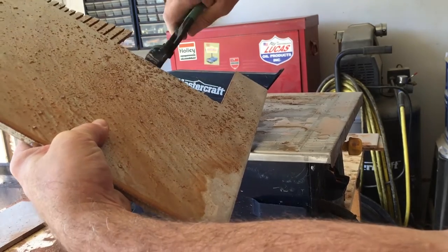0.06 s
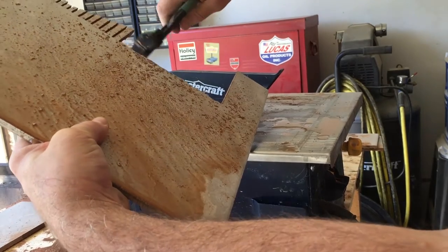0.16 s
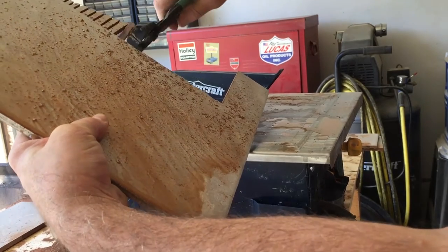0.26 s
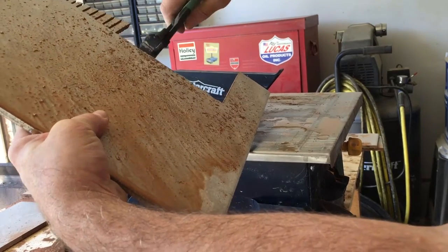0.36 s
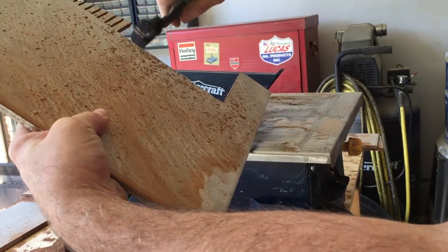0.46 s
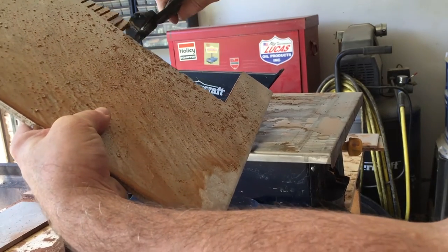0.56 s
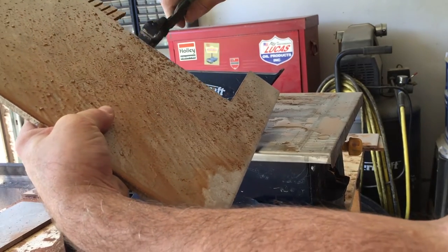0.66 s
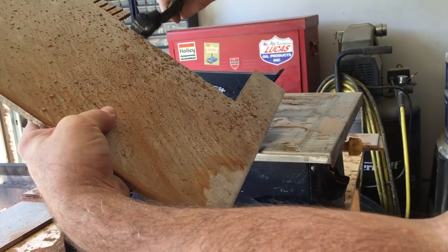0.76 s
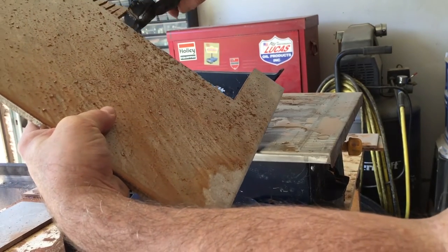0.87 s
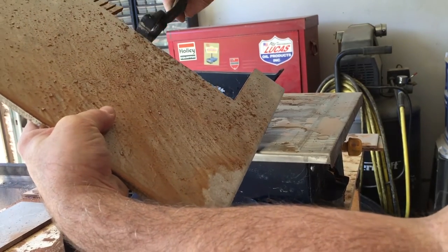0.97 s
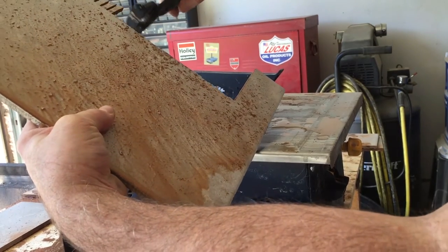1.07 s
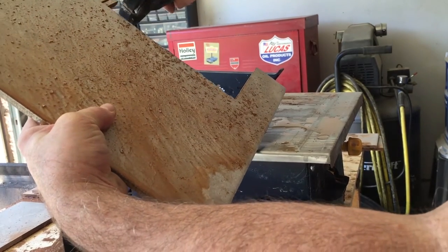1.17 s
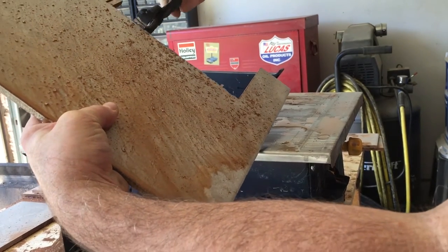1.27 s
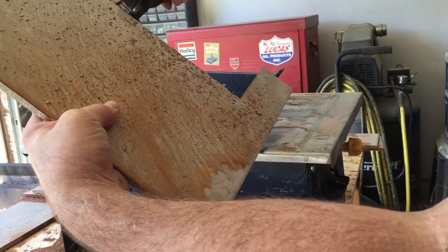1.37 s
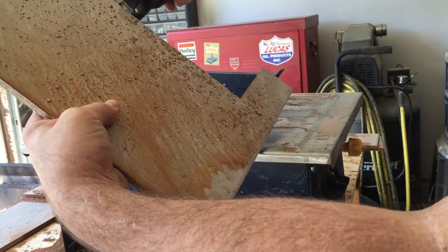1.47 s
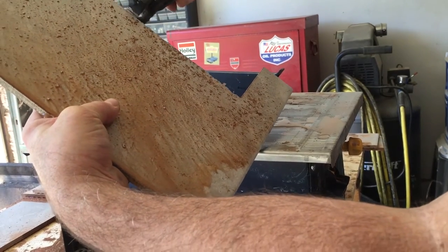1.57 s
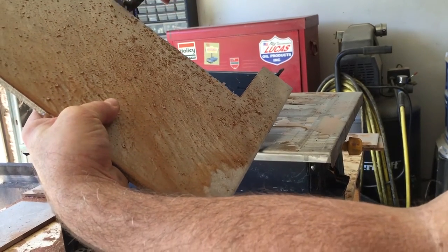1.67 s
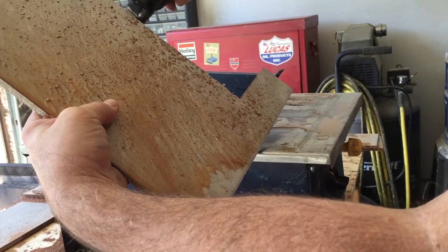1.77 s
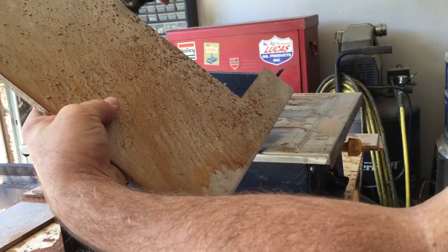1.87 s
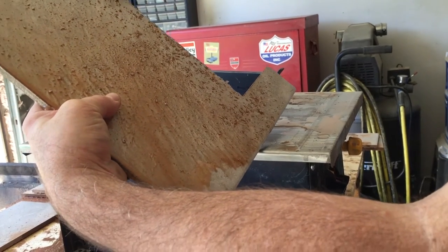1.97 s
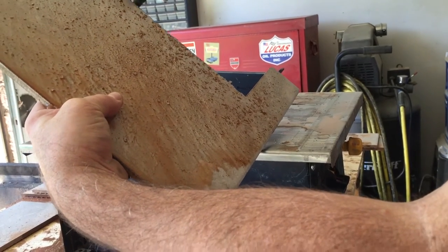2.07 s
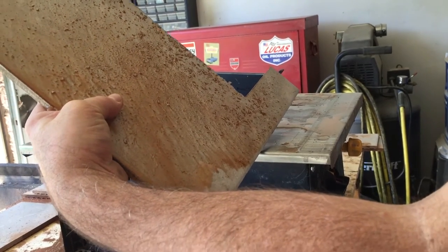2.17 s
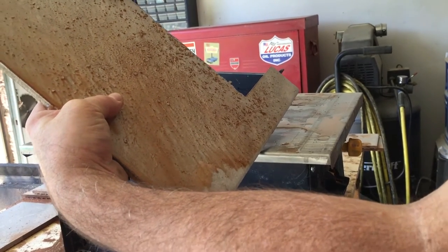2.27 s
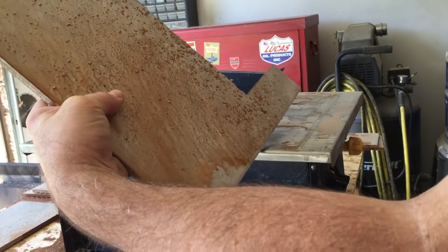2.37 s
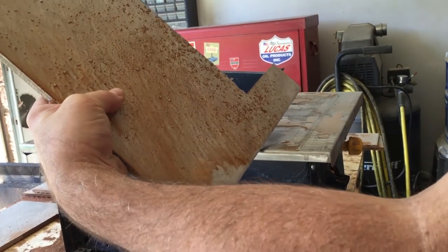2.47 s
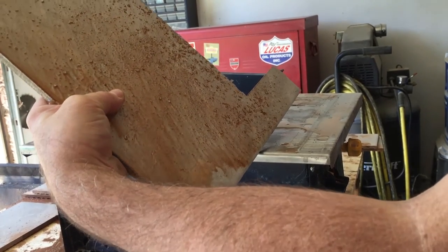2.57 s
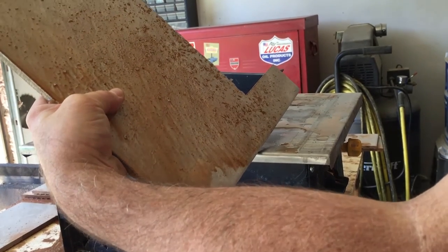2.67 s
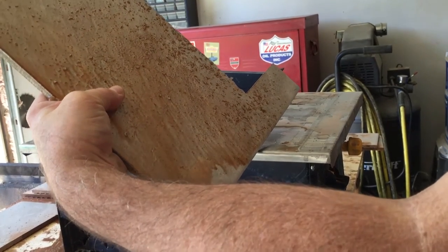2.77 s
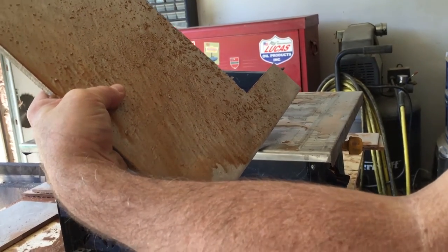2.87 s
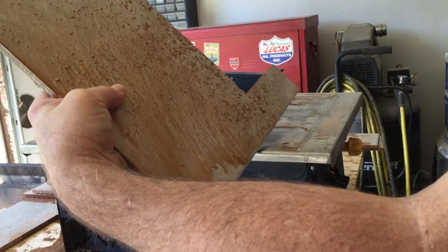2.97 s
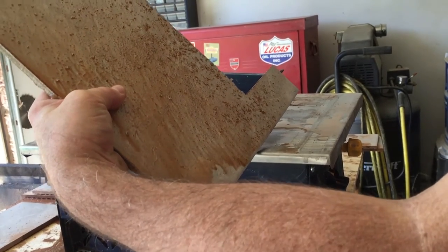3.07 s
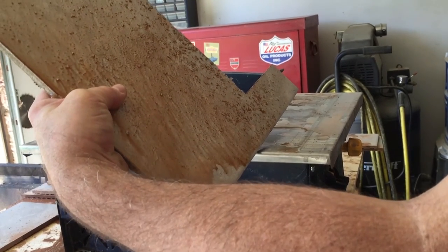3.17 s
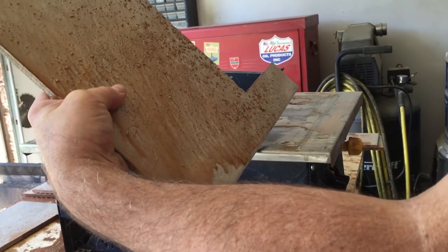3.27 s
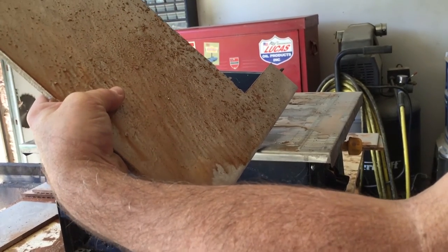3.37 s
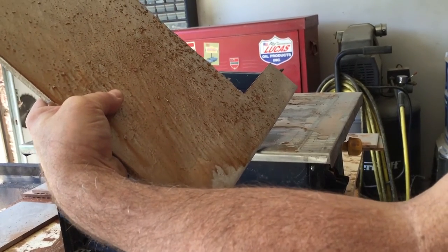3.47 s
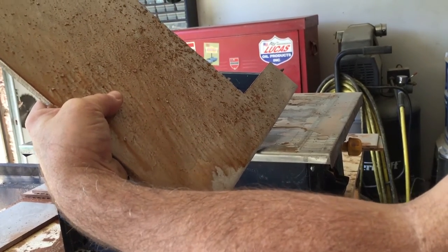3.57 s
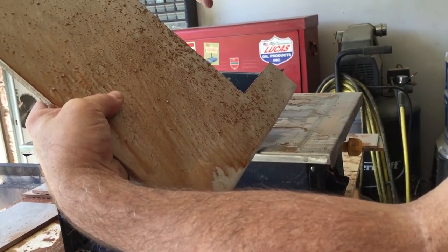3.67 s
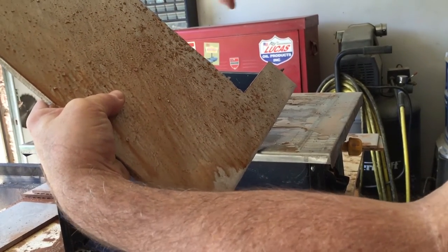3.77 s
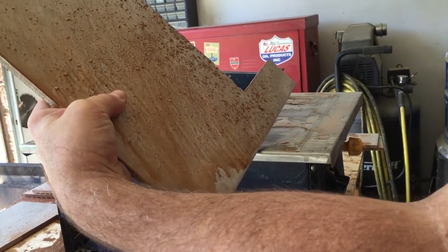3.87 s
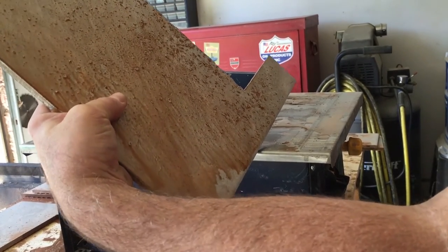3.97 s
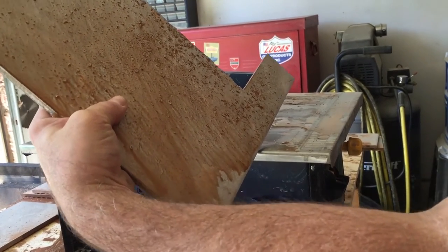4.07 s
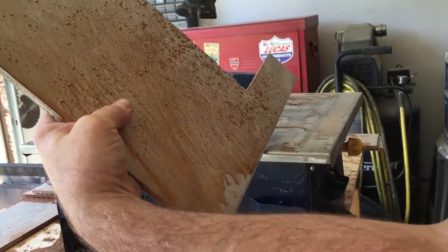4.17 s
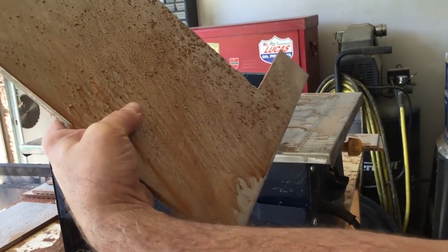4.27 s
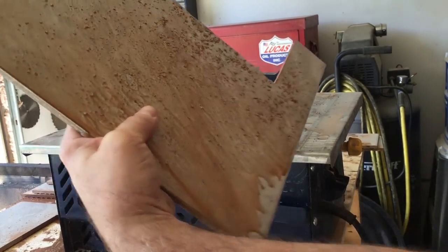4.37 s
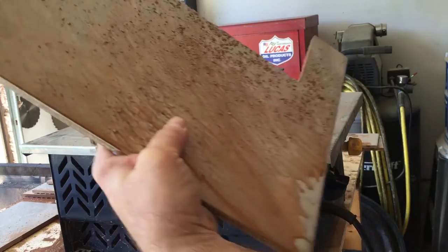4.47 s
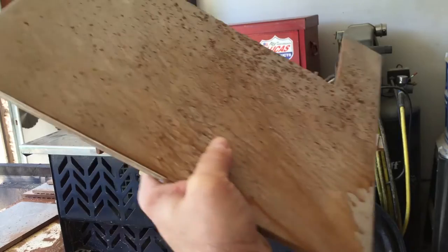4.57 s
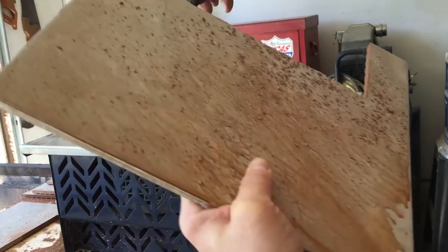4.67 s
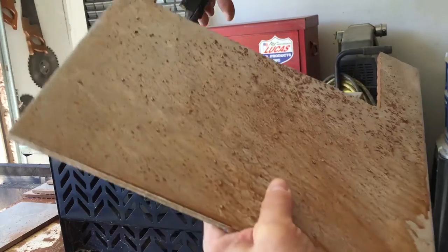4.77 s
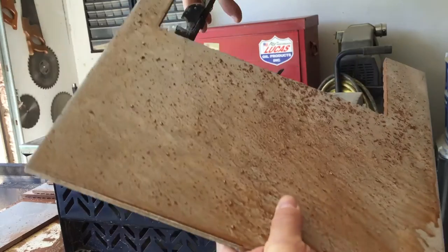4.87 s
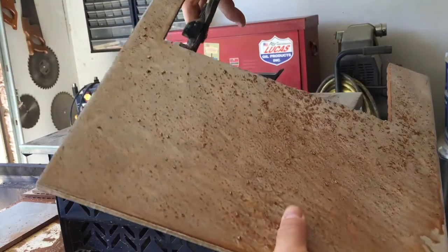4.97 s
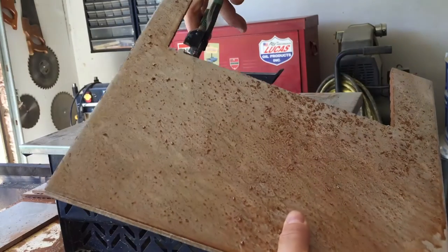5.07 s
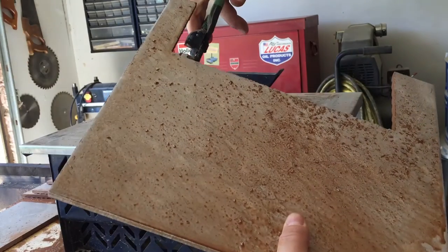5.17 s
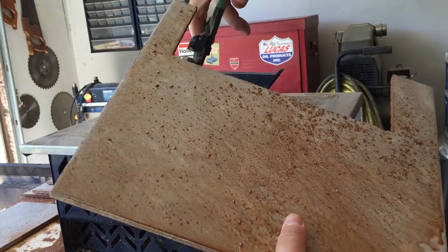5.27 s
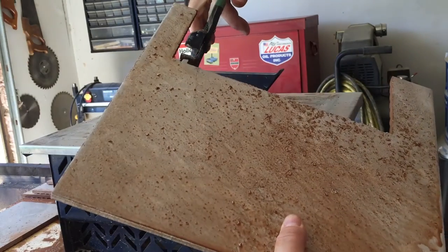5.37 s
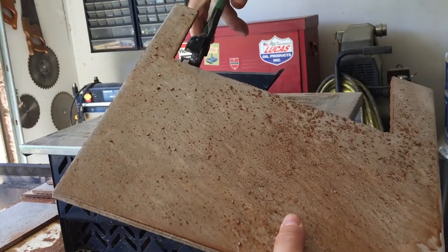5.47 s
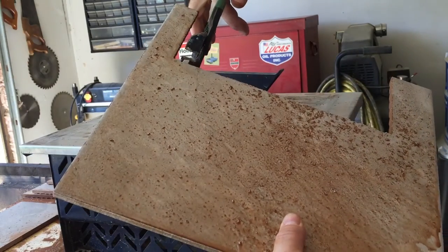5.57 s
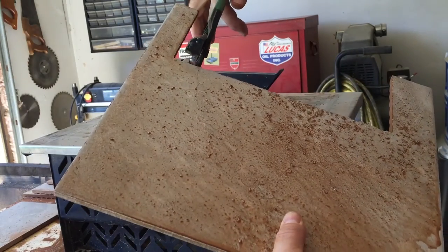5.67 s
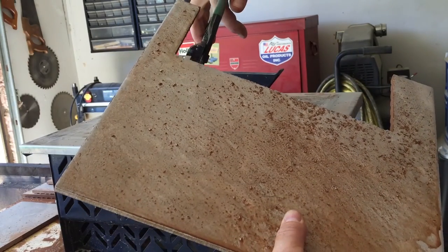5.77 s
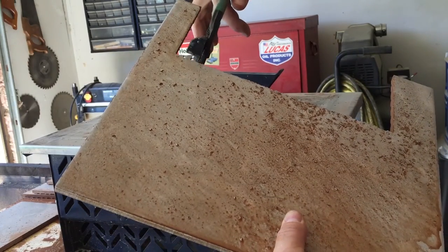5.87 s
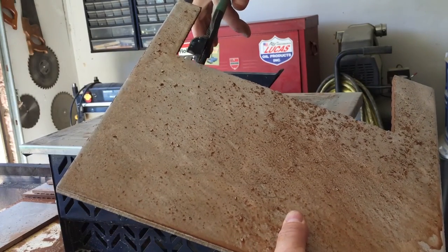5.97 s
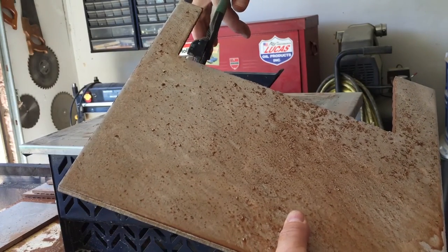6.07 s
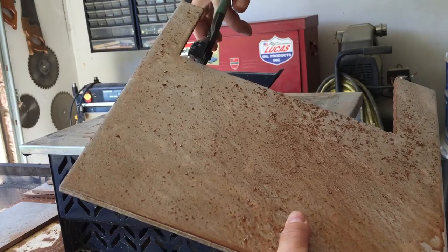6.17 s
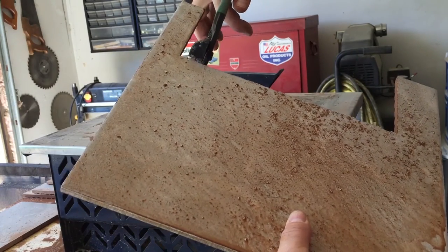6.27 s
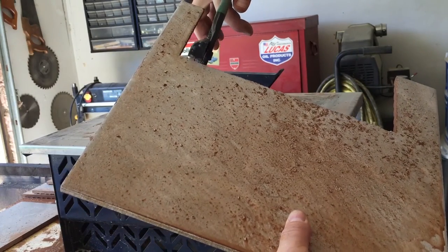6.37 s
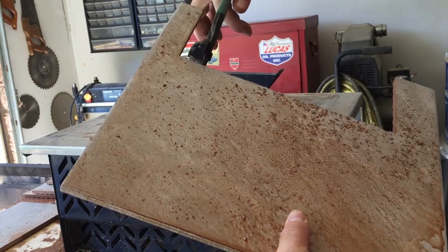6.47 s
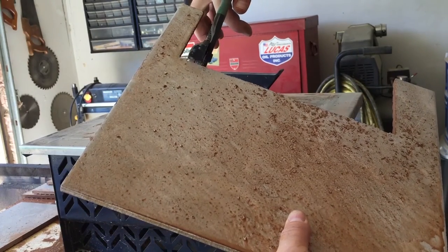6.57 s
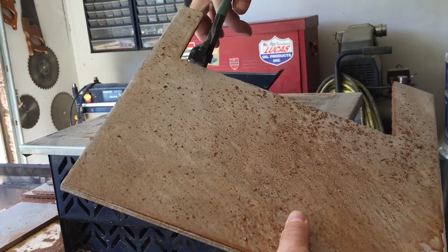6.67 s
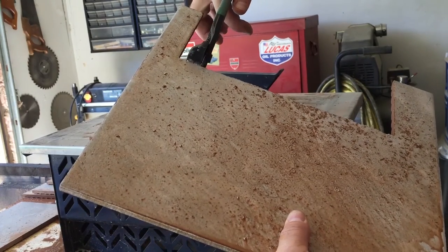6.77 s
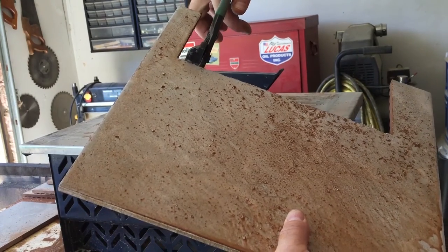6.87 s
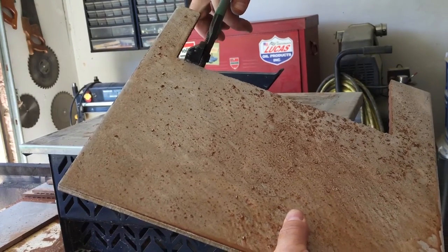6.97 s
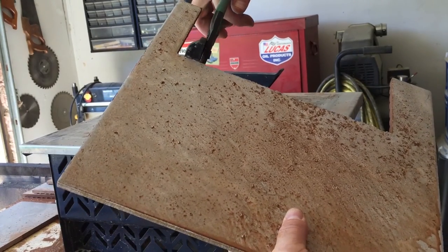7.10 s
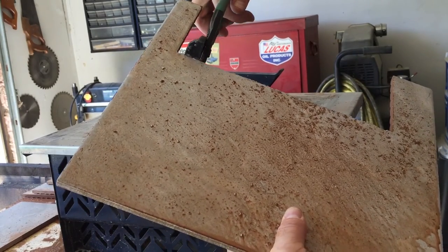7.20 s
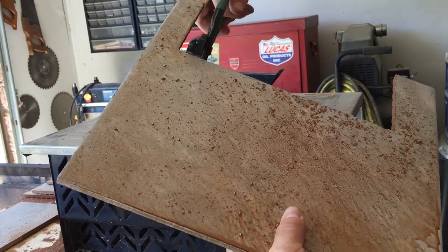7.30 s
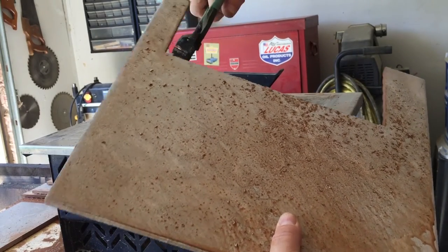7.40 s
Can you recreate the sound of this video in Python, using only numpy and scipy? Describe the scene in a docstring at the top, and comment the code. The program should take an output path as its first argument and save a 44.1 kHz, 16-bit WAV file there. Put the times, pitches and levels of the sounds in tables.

```python
"""In a garage, close by: nippers snap chips off a hand-held tile, noise cracks with ringing modes, for 3 s.
Chips bounce on a steel bench and a larger piece thuds. The tile is then turned and the jaws scrape and knock
along a new edge, random catches ringing its modes, among puffs of filtered hiss. A dove outside coos gliding
sines from 5 s. One last loud snap starts just before the end. Throughout, narrow noise bands make a motor
hum over a broad murmur; the microphone loses deep bass, gain control follows loud blows, the loudest clip."""
import sys
import numpy as np
from scipy import signal
from scipy.fft import rfft, irfft
from scipy.io import wavfile
from scipy.ndimage import uniform_filter1d

SR = 44100
rng = np.random.default_rng(int(sys.argv[2]) if len(sys.argv) > 2 else 0)


def pcm_store(signal):
    """Save signal as 16-bit PCM."""
    levels = np.round(np.clip(np.atleast_2d(signal), -1, 1) * 32767)
    wavfile.write(sys.argv[1], SR, levels.astype(np.int16).T)


N = 328104  # length in samples

SPREAD_DB = 2.2  # chance spread of mode levels from blow to blow
GRIP_HZ = 14  # spread of the detuning by the shifting grip


def gain_of(db):
    """Amplitude factor for a level in dB."""
    return 10 ** (np.asarray(db) / 20)


def evened(x):
    """Scale to an rms of 1."""
    return x / np.sqrt(np.mean(x ** 2) + 1e-20)


def read(points, hz):
    """Read a curve of (Hz, value) points, interpolated over log frequency."""
    f, value = np.transpose(points)
    return np.interp(np.log(hz + 1), np.log(f + 1), value)


def resonate(x, hz, width):
    """A two-pole resonance of gain about 1."""
    r = np.exp(-np.pi * width / SR)
    return signal.lfilter([1 - r, 0, r - 1], [1, -2 * r * np.cos(2 * np.pi * hz / SR), r * r], x)


def ringing(modes, colour, spread_db):
    """One blow on a body: each mode gets a chance strength and sign; the grip detunes it, low modes most by ratio."""
    hz, db, t60 = np.transpose(modes)[:, :, None]
    t = np.arange(SR // 3) / SR
    chance = rng.standard_normal((3, len(modes), 1))
    level_db = db + read(colour, hz) + spread_db * chance[1] - 60 * t / np.clip(t60, .02, .3)
    detuned = hz + GRIP_HZ * chance[2]
    envelope = np.exp(np.float32(level_db * np.log(10) / 20))
    tones = np.sin(np.float32(2 * np.pi * detuned * t))
    return (np.sign(chance[0]) * envelope * tones).sum(0)


def blows(events, modes, kind, spread_db):
    """Each blow is a gritty crack, a shard with a cluster of modes, and a body coloured by where it is struck."""
    out, t = np.zeros(N + SR), np.arange(SR // 3) / SR
    hz = np.fft.rfftfreq(len(t), 1 / SR)
    rise, ring_db, shard_db, share = kind
    for s, db, low_db, middle_db, high_db, treble_db, shard_hz, t60 in events:
        # noise whose level jumps every 60 samples
        steps = gain_of(2.9 * rng.standard_normal(len(t) // 60 + 1)).repeat(60)[:len(t)]
        grit = rng.standard_normal(len(t)) * steps
        colour = [(80, low_db - 45), (300, low_db - 10), (600, low_db + 4), (1600, middle_db + 14),
                  (2500, db - 2), (5000, db - 1), (8500, treble_db + 7), (15000, treble_db - 6.5)]
        coloured = irfft(rfft(evened(grit)) * gain_of(read(colour, hz)), len(t))
        crack = coloured * gain_of(-60 * t / np.clip(t60, .02, .2))
        # twelve weaker modes scattered around the shard's main pitch
        others = [(min(shard_hz * np.exp(.24 * a), 15000), -6, t60 * (0.52 + b))
                  for a, b in zip(rng.standard_normal(12), rng.random(12))]
        shard_modes = [(shard_hz, 0, 1.5 * t60)] + others
        shard = ringing(shard_modes, [(shard_hz, shard_db + share * high_db)], spread_db)
        struck = [(1100, low_db), (1400, middle_db), (1850, middle_db), (2300, high_db - 6)]
        body = gain_of(ring_db) * ringing(modes, struck, spread_db)
        onset = np.minimum(t / max(rise, .0002), 1)
        out[round(s * SR):][:len(t)] += onset * (crack + shard + body)
    return out[:N]


# Snaps of the tile, close by. Each row: start in seconds, then crack, low modes, middle modes, clink and treble
# as drive levels in dB, central shard pitch in Hz, decay setting (T60 before limits) in seconds.
SNAP_EVENTS = [(0.0, -24.0, -27.5, -27.5, -23.5, -23.0, 4320, 0.15),
               (0.2206, -8.0, -20.5, -20.5, -15.5, -14.5, 2880, 0.11),
               (0.4876, -22.5, -27.5, -36.5, -19.5, -10.5, 2870, 0.069),
               (0.5031, -3.0, -21.5, -21.0, -13.5, -14.0, 3420, 0.091),
               (0.8052, -9.0, -27.0, -20.5, -15.5, -13.5, 8370, 0.12),
               (0.8194, -3.0, -16.5, -25.5, -24.0, -25.0, 4160, 0.12),
               (1.1276, -9.0, -23.0, -21.5, -20.5, -21.0, 3780, 0.099),
               (1.3651, -8.0, -23.0, -21.0, -24.0, -22.5, 3950, 0.084),
               (1.7178, -1.0, -18.0, -14.5, -20.5, -15.5, 2890, 0.12),
               (1.9519, -9.5, -33.5, -31.5, -19.5, -6.5, 8070, 0.046),
               (1.9588, 3.0, -18.0, -19.0, -16.5, -4.0, 9000, 0.07),
               (2.2416, 2.5, -17.0, -18.0, -16.5, -5.5, 3470, 0.071),
               (2.5039, -5.0, -44.5, -29.0, -27.0, -9.0, 7660, 0.052),
               (2.5094, -0.0, -19.5, -21.5, -12.0, -17.5, 3530, 0.067),
               (2.7495, -6.5, -23.5, -14.0, -14.0, -31.0, 3520, 0.065),
               (2.7632, -24.5, -33.5, -28.0, -29.5, -23.5, 3520, 0.1),
               (2.9957, -12.0, -19.0, -15.5, -19.0, -35.5, 4240, 0.069),
               (7.424, 11.0, -13.0, -13.5, -3.0, -1.0, 6760, 0.067)]
# Modes of the hand-held tile. Each row: centre frequency in Hz, relative level in dB, T60 in seconds.
TILE_MODES = [(349, -2.5, 0.05), (585, -4, 0.11), (664.3, -1.5, .1), (850, -8, .1), (1031, -5, 0.083),
              (1425, -12.5, .08), (1539, 1, 0.17), (1716, -6.5, 0.24), (1790, -5, .15), (2000, -3.5, .14),
              (2270, -0.5, .15), (2602, -9.5, 0.11), (3330, -5, .15), (3460, -0.5, .2), (3790, -4, .2),
              (3994, -6, .18), (4270, -6.5, 0.06), (5000, -11, .2), (6017, -7.5, .2), (6760, -16, .15)]
# What each kind of blow shares: rise in seconds, ring of the body in dB,
# shard level at 0 dB clink in dB, share of the clink that the shard follows.
SNAP_KIND = (.0018, -2, -12, .6)


def snaps():
    """The jaws break the edge, so the tile rings with all its modes."""
    return blows(SNAP_EVENTS, TILE_MODES, SNAP_KIND, SPREAD_DB)


# Chips knocking tile and bench. Each row: start in seconds, then crack, low modes, middle modes, clink and treble
# as drive levels in dB, central shard pitch in Hz, decay setting (T60 before limits) in seconds.
CHIP_EVENTS = [(0.093, -34.0, -46.0, -42.5, -30.5, -40.5, 3450, 0.073),
               (0.2875, -10.0, -21.5, -17.0, -8.0, -10.0, 3470, 0.079),
               (0.5785, -17.0, -34.5, -30.5, -20.0, -14.0, 3340, 0.029),
               (0.5821, -4.0, -22.5, -15.0, -7.5, -11.5, 4380, 0.087),
               (0.8719, -8.0, -28.0, -23.5, -29.5, -15.5, 6420, 0.056),
               (0.8893, -12.5, -20.5, -19.0, -21.5, -22.0, 3470, 0.12),
               (0.9586, -11.5, -38.5, -36.0, -33.5, -15.5, 6730, 0.035),
               (0.9781, -19.5, -34.0, -34.0, -29.0, -36.5, 4220, 0.056),
               (1.1852, -10.5, -24.0, -25.5, -19.5, -25.0, 8500, 0.071),
               (1.1906, -2.5, -22.5, -20.0, -9.0, -12.5, 3450, 0.064),
               (1.4521, 2.5, -28.0, -18.0, -6.0, -12.5, 4580, 0.049),
               (1.8143, -13.5, -27.0, -28.0, -38.0, -35.0, 4150, 0.09),
               (1.8835, -17.0, -38.5, -35.0, -29.5, -21.0, 8270, 0.077),
               (1.9985, -8.0, -18.0, -23.0, -23.5, -29.0, 4810, 0.093),
               (2.1164, -20.0, -32.0, -42.0, -37.0, -28.5, 4230, 0.065),
               (2.1784, -27.0, -41.0, -51.0, -45.0, -42.5, 4400, 0.06),
               (2.3289, -24.5, -36.0, -36.0, -28.5, -26.0, 3710, 0.088),
               (2.374, -27.5, -47.0, -44.0, -44.5, -28.5, 6050, 0.052),
               (2.4494, -21.0, -48.5, -36.5, -33.0, -30.5, 5350, 0.074),
               (2.615, -13.5, -34.5, -28.0, -25.5, -15.5, 9000, 0.048),
               (2.7844, -26.5, -25.5, -32.0, -40.5, -30.0, 3500, 0.043),
               (2.8667, -19.5, -60.5, -50.5, -36.5, -37.0, 8170, 0.038),
               (2.8839, -38.5, -54.0, -42.0, -50.5, -50.0, 3440, 0.042),
               (3.038, -44.0, -48.0, -28.0, -48.0, -41.0, 3500, 0.06)]
# Modes of the steel bench. Each row: centre frequency in Hz, relative level in dB, T60 in seconds.
BENCH_MODES = [(2536, -15, 0.22), (3004, -10.5, 0.17), (3486, 3.5, 0.072), (3770, -9.5, 0.23),
               (4290, -8, 0.099), (4510, 1, .12), (4600, -18.5, 0.093), (5351, -12, .15), (6100, -19, .15),
               (8300, -14.5, .12), (8430, -15, 0.11), (8995, -20.5, .12)]
CHIP_KIND = (.0014, -1, -22, .35)  # as SNAP_KIND


def chips():
    """Bouncing chips excite the tile's ten lowest modes and the bench together."""
    return blows(CHIP_EVENTS, TILE_MODES[:10] + BENCH_MODES, CHIP_KIND, SPREAD_DB)


# A larger piece drops and bounces; later the tile brushes and bumps the bench. Each row: start in seconds,
# peak level of the noise in dB, body pitch in Hz, upper noise edge in Hz, time to fall 20 dB in seconds,
# rise in seconds.
THUD_EVENTS = [(1.161, 0, 263, 2200, 0.021, 0.0013), (1.304, -17, 400, 2400, .014, .0012),
               (1.4, -18, 515, 2600, 0.053, 0.0009), (4.208, -37.5, 352, 3100, .05, .03),
               (5.894, -35, 270, 834, 0.0089, 0.0012), (5.999, -32, 329, 833.3, 0.014, .001)]


def thuds():
    """A dull blow: band-passed noise and a briefly ringing hollow body."""
    out, t = np.zeros(N + SR), np.arange(SR // 4) / SR
    for s, db, body_hz, edge_hz, length, rise in THUD_EVENTS:
        burst = rng.standard_normal(len(t)) * gain_of(-20 * t / length) * np.minimum(t / rise, 1)
        dull = signal.sosfilt(signal.butter(2, [240, edge_hz], "band", fs=SR, output="sos"), burst)
        onset = np.minimum(t / (rise + 0.0035), 1)
        body = np.sin(2 * np.pi * body_hz * t) * gain_of(-16 * t / length) * onset
        out[round(s * SR):][:len(t)] += gain_of(db) * (dull / abs(dull).max() + gain_of(-12.5) * body)
    return out[:N]


# Blows that set off the tile's longest ring. Each row: start in seconds, level before decay in dB.
RING_BLOWS = [(0.0, -22.5), (.288, -27), (.584, -31), (.89, -32), (1.19, -33), (1.454, -23), (1.719, -28),
              (1.959, -32), (2.243, -32), (2.511, -18), (2.75, -17), (2.997, -17.5)]
RING_T60 = .44  # seconds
RING_HZ, RING_CLIMB_HZ_PER_S = 1610, 6.5  # the ring rises as the edge is nibbled away


def long_ring():
    """The one mode of the tile that the hand hardly damps."""
    out, t = np.zeros(N + SR), np.arange(SR // 2) / SR
    for s, db in RING_BLOWS:
        hz = RING_HZ + RING_CLIMB_HZ_PER_S * s
        decay = gain_of(db - 60 * t / RING_T60)
        out[round(s * SR):][:len(t)] += decay * np.sin(2 * np.pi * hz * t) * np.minimum(t / 0.0035, 1)
    return out[:N]


# Jaws knocking the turned tile. Each row: start in seconds, then crack, low modes, middle modes, clink and treble
# as drive levels in dB, central shard pitch in Hz, decay setting (T60 before limits) in seconds.
KNOCK_EVENTS = [(4.5744, -53.0, -54.0, -68.0, -68.0, -72.0, 3514, 0.04),
                (5.898, -14.5, -27.0, -40.0, -36.0, -29.5, 4250, 0.026),
                (5.9983, -30.0, -21.5, -36.5, -34.0, -32.0, 8370, 0.036),
                (6.0297, -30.0, -54.0, -39.5, -43.0, -35.5, 3370, 0.025),
                (6.0763, -40.0, -36.5, -46.0, -38.0, -42.0, 4260, 0.027),
                (6.1128, -35.0, -67.0, -48.5, -44.0, -43.0, 3680, 0.04),
                (7.0587, -29.5, -61.0, -57.0, -37.0, -35.0, 5470, 0.033),
                (7.3464, -31.0, -46.5, -57.0, -39.5, -36.0, 6930, 0.047),
                (7.3979, -22.0, -39.0, -44.0, -29.0, -22.0, 7000, 0.038)]
# The tile gripped by its other edge. Each row: centre frequency in Hz, relative level in dB,
# T60 in seconds before limits (the scrape shortens it).
TURNED_MODES = [(327, -15, 0.072), (580, -5, .1), (665, -3.5, 0.12), (1096, -16.5, .07),
                (1453, 1.5, 0.0895), (1553, -0.5, .3), (1776, -15.5, 0.17), (1891, -13.5, 0.11),
                (2252, -12.5, 0.38), (2500, -26.5, 0.18), (2950, -15, 0.089), (3226, -0.5, 0.055),
                (3537, 1.5, 0.095), (3870, -7.5, 0.13), (4280, -10, 0.14), (5082, -18, 0.16),
                (5550, -4, 0.088), (5912, -3.5, 0.083), (6733, -2.5, 0.062), (8260, -8.5, 0.21),
                (8720, -6, 0.09), (9200, -18, 0.098), (10610, -27, .08), (12200, -11, 0.091),
                (13800, -17.5, 0.12)]
KNOCK_KIND = (.0024, .66, -24, .52)  # as SNAP_KIND


def knocks():
    """The jaws tap the tile, which rings with the modes of its new grip."""
    return blows(KNOCK_EVENTS, TURNED_MODES, KNOCK_KIND, SPREAD_DB)


def gestures(rows, rise, fade_db_per_s):
    """Gain over time: each row rises, holds to its end and fades."""
    t = np.arange(0, N + 40, 40) / SR  # one point every 40 samples
    gain = 0
    for s, length, db, *_ in rows:
        fade_db = fade_db_per_s * np.maximum(t - s - length, 0)
        gain = gain + np.clip((t - s) / rise, 0, 1) ** 2 * gain_of(db - fade_db)
    return np.interp(np.arange(N) / SR, t, gain)


# Strokes of jaws and fingers along the edge. Each row: start in seconds, length in seconds,
# pressure as drive level in dB.
EDGE_STROKES = [(4.135, .055, -57.5), (4.205, .045, -52), (4.465, .025, -66), (4.55, .035, -60),
                (5.525, .04, -51), (5.6, .025, -60), (5.635, .04, -40), (5.715, .02, -56), (6.0, .06, -48),
                (6.075, .06, -44), (6.145, .05, -47), (6.31, .04, -59), (6.62, .09, -58),
                (6.785, .035, -55), (6.84, .02, -64), (6.91, .03, -64), (6.965, .04, -43.5),
                (7.03, .025, -54), (7.06, .03, -48), (7.095, .03, -45), (7.18, .065, -54),
                (7.33, .055, -43), (7.385, .035, -37.5)]
STROKE_RISE_S, STROKE_FADE_DB_PER_S = .012, 900


def scrape():
    """Carbide jaws catch on grains of the edge in clumps; each catch rings the turned tile."""
    clumps = gain_of(3.5 * evened(uniform_filter1d(rng.standard_normal(N), 250)))
    strength = gain_of(3.5 * np.minimum(rng.exponential(1, N), 4))
    caught = rng.random(N) < 5000 / SR  # about 5000 catches a second
    catches = strength * caught * rng.choice([-1, 1], N)
    drive = evened(catches * clumps) * gestures(EDGE_STROKES, STROKE_RISE_S, STROKE_FADE_DB_PER_S)
    # the touching jaws damp the tile, high modes most
    damped = [(hz, db, (0.33 * t60 if hz > 2000 else 0.5 * t60)) for hz, db, t60 in TURNED_MODES]
    body = ringing(damped, [(700, -2), (1500, -5), (3500, 2.5), (9000, -1)], 0)
    rung = signal.oaconvolve(drive, body / np.linalg.norm(body))[:N]
    grit = gain_of(-7.5) * resonate(drive, 2700, 3400) + gain_of(-13) * resonate(drive, 9000, 9000)
    return gain_of(-2.0) * rung + grit


# Narrow bands of the hiss. Each row: centre in Hz, width of each of two filter passes in Hz, filter gain in dB.
HISS_BANDS = [(7980, 210, 2.5), (8640, 300, -3)]
# Puffs of a thin high hiss. Each row: start in seconds, length in seconds, level in dB.
HISS_PUFFS = [(4.37, .08, -67), (5.13, .07, -78), (5.37, .08, -68), (6.28, .08, -64), (6.4, .05, -74),
              (6.575, .2, -65), (6.87, .07, -66)]
HISS_RISE_S, HISS_FADE_DB_PER_S = .03, 500


def high_hiss():
    """Noise in two narrow high bands, swelling in puffs."""
    noise = rng.standard_normal(N)
    bands = sum(gain_of(db) * resonate(resonate(noise, hz, width), hz, width) for hz, width, db in HISS_BANDS)
    return evened(bands) * gestures(HISS_PUFFS, HISS_RISE_S, HISS_FADE_DB_PER_S)


# Notes of the dove outside, each gliding evenly. Each row: start in seconds, length in seconds,
# level in dB rms when held, start pitch in Hz, end pitch in Hz.
DOVE_NOTES = [(5.05, .06, -60, 505, 522), (5.13, .15, -55, 533, 526), (5.315, .12, -59, 520, 495),
              (6.275, .09, -56, 500, 520), (6.42, .11, -57, 516, 508)]
NOTE_RISE_S, NOTE_FADE_DB_PER_S = .03, 700


def dove():
    """Soft, nearly pure notes: one sine follows the gliding pitch."""
    start, length, _, first_hz, last_hz = np.transpose(DOVE_NOTES)
    times = np.ravel([start, start + length], "F")
    pitch = np.interp(np.arange(N) / SR, times, np.ravel([first_hz, last_hz], "F"))
    tone = np.sqrt(2) * np.sin(2 * np.pi * np.cumsum(pitch) / SR)
    return tone * gestures(DOVE_NOTES, NOTE_RISE_S, NOTE_FADE_DB_PER_S)


# Wavering motor tones. Each row: centre in Hz, width of each of two filter passes in Hz,
# level before the throb in dB rms.
MOTOR_TONES = [(63.1, 5.1, -53.5), (106.2, 8.3, -66), (125, 2.5, -60.5), (187.3, 10, -58)]


def motor():
    """Narrow noise bands make tones that waver and throb together."""
    noise = rng.standard_normal(N)
    throb = gain_of(6.6 * evened(resonate(rng.standard_normal(N), 1.4, 3.0)))
    hum = sum(gain_of(db) * evened(resonate(resonate(noise, f, width), f, width)) for f, width, db in MOTOR_TONES)
    return hum * evened(throb)


# Spectrum of the garage air. Each row: frequency in Hz, relative level in dB.
AIR_SPECTRUM = [(15, -69), (25, -35), (41, -13.5), (64, -5), (184, -11), (261, -19), (371, -21),
                (486, -26.5), (709, -29.5), (1390, -36), (1510, -37), (2260, -38), (15800, -51)]
AIR_DB = -53.5  # rms before the microphone


def murmur():
    """The broad murmur of the garage: noise shaped by a fixed spectrum."""
    hz = np.fft.rfftfreq(N, 1 / SR)
    air = irfft(rfft(rng.standard_normal(N)) * gain_of(read(AIR_SPECTRUM, hz)), N)
    return gain_of(AIR_DB) * evened(air)


# Reverberation of the garage. Each row: frequency in Hz, T60 in seconds.
GARAGE_T60 = [(250, 0.85), (1000, 0.47), (4000, 0.33), (14000, 0.27)]


def garage(x):
    """Sparse taps of random sign, each band dying at its own speed."""
    taps = np.zeros(SR)
    at = np.arange(200, SR - 20, 20) + rng.integers(0, 20, (SR - 201) // 20)
    taps[at] = rng.choice([-1., 1.], len(at))
    hz, t, z = signal.stft(taps, SR, nperseg=256)
    decay = gain_of(-60 * t / read(GARAGE_T60, hz)[:, None])
    tail = signal.istft(z * decay, SR, nperseg=256)[1]
    return signal.oaconvolve(x, tail / np.linalg.norm(tail))[:N]


def scene():
    """Close work and its garage reverberation, with hiss, dove, motor and murmur added dry."""
    cutting = snaps() + chips() + thuds()
    handling = knocks() + scrape()
    near = cutting + handling + long_ring()
    reverberation = garage(gain_of(-7.7) * cutting + gain_of(-14) * handling)
    return (near + reverberation + high_hiss() + dove() + motor() + murmur())[None]


EDGE_HZ = 15900  # upper band limit


def record(dry):
    """The microphone drops deep bass; gain control ducks loud blows; the loudest clip; then the band limit."""
    dry = signal.sosfilt(signal.butter(3, 48, "high", fs=SR, output="sos"), dry)
    power_db = 10 * np.log10(abs(uniform_filter1d(dry[0] ** 2, 600)) + 1e-12)
    fall = np.arange(N) * 15.0 / SR  # the held level falls 15 dB a second
    held_db = np.maximum.accumulate(power_db + fall) - fall
    over_db = np.maximum(held_db + 29, 0)  # threshold -29 dB
    # 0.17 dB less gain for each dB over
    ducked = np.clip(dry / gain_of(0.17 * uniform_filter1d(over_db, 300)), -1, 1)
    lowpass = signal.firwin(511, EDGE_HZ, window=("kaiser", 9), fs=SR)
    return signal.oaconvolve(ducked, lowpass[None], "same")


dry = scene()
out = record(dry)
pcm_store(out)
```